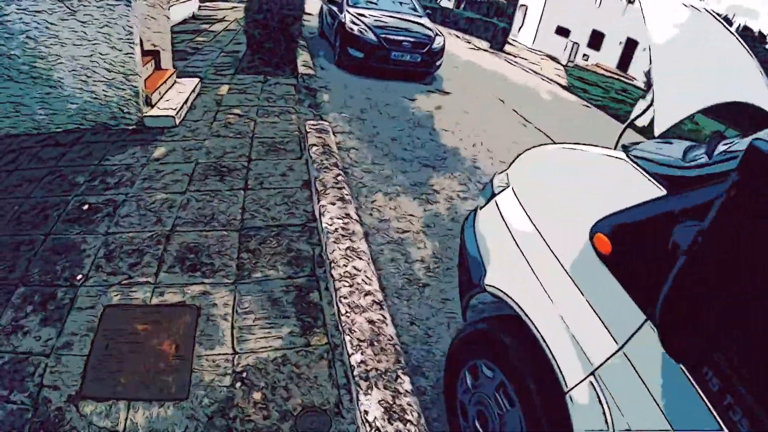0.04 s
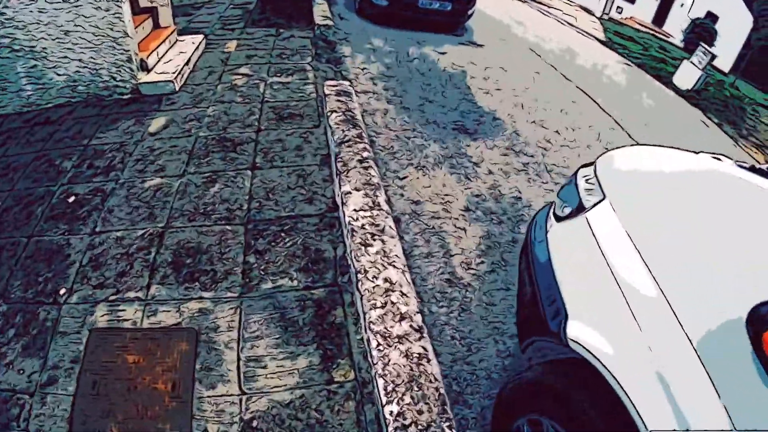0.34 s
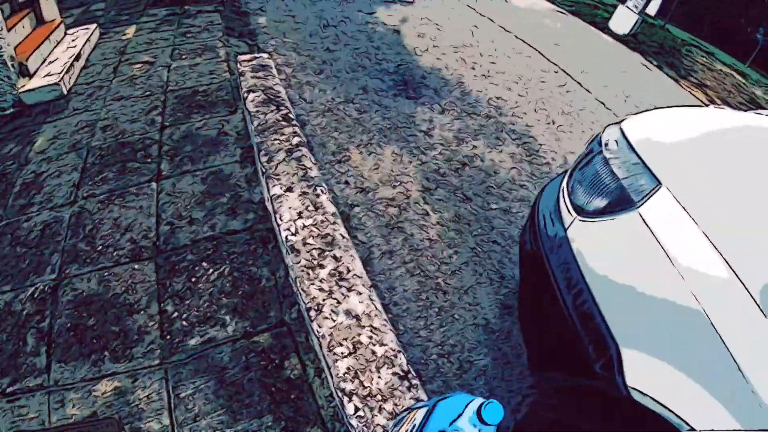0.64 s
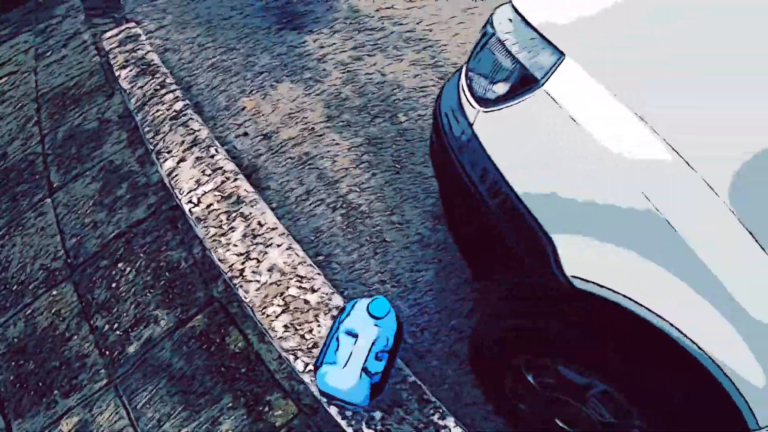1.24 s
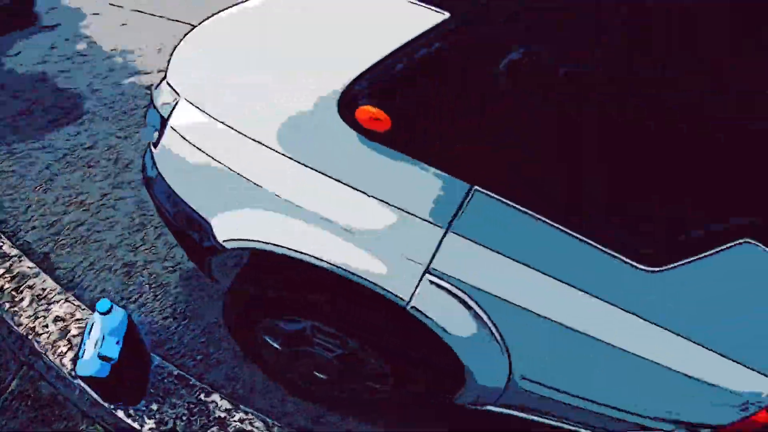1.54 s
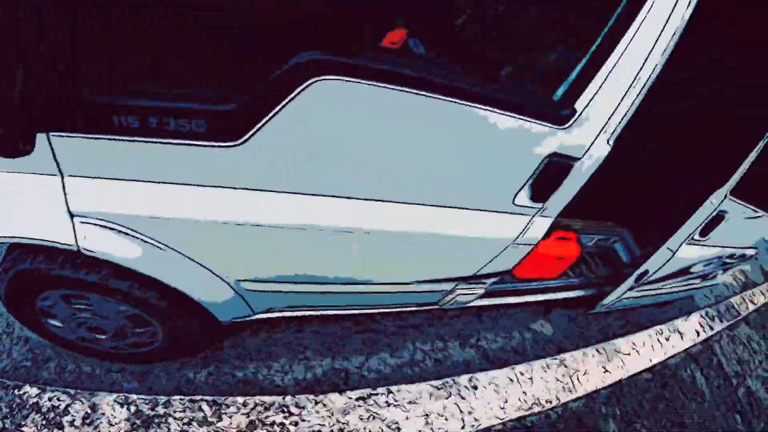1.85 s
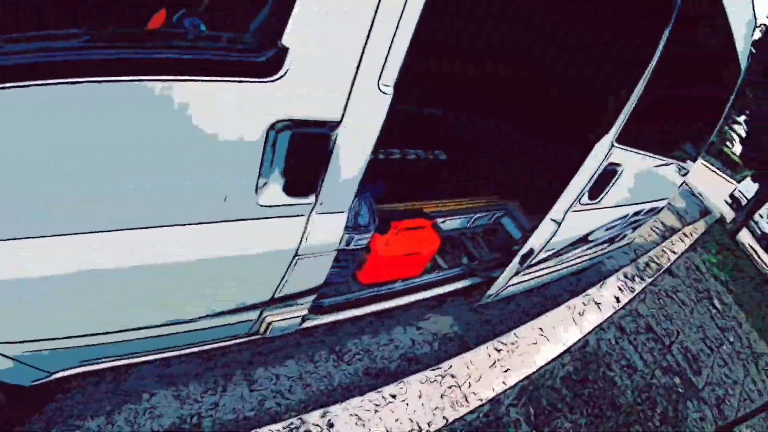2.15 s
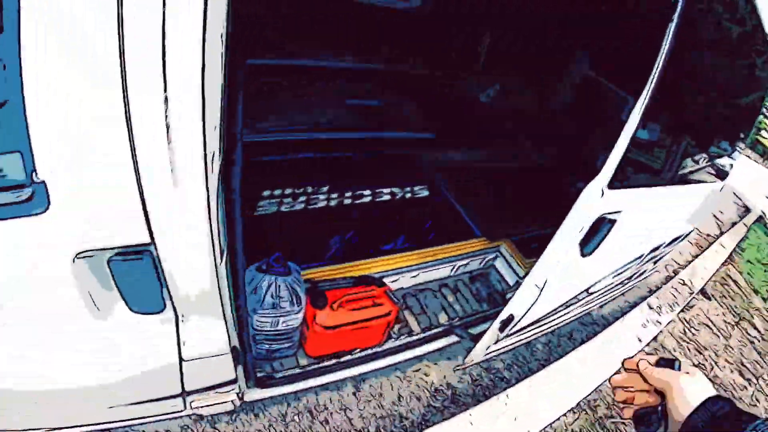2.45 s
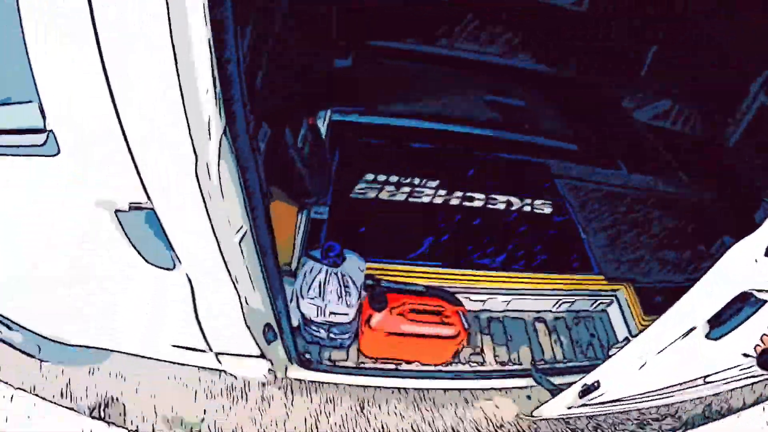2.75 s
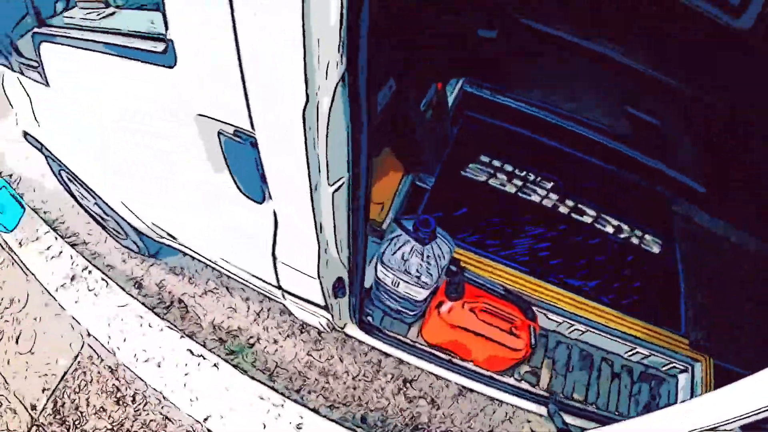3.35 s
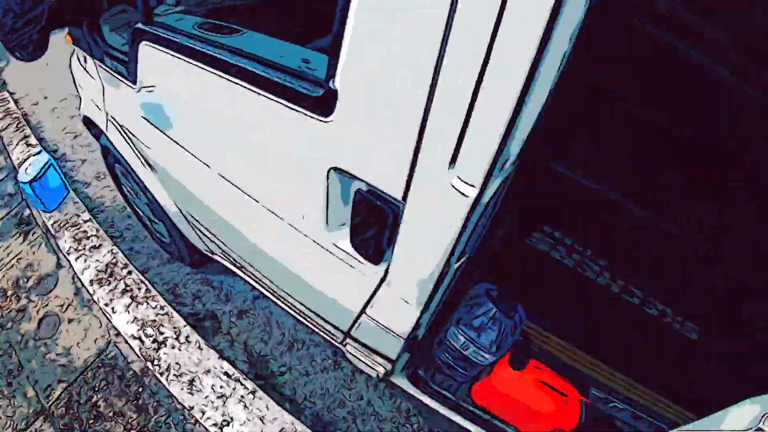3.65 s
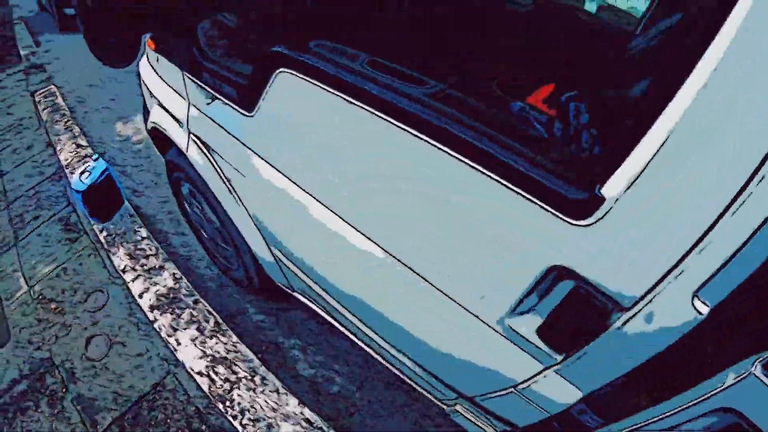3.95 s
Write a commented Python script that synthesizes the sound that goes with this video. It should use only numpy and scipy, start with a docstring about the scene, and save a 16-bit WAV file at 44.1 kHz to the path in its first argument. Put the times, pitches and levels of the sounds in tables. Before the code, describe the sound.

A van's sliding door clicks and rolls along its track, rumbling and rattling ever louder. Before that, a plastic bottle crackles as it is set down and soft steps scuff a quiet street, heard close from a body-worn microphone.

```python
"""A van's sliding door

On an almost silent street, a plastic bottle crackles as it is set down on the kerb, and soft steps
thud and scuff on the paving. A latch clicks, then the van's side door rolls along its track, rumbling
ever louder and rattling as it gathers speed. The microphone is worn on the body, close and dull."""
import sys
import numpy as np
from scipy import signal
from scipy.fft import rfft, irfft, next_fast_len
from scipy.io import wavfile
from scipy.ndimage import uniform_filter1d

SR = 44100
rng = np.random.default_rng(int(sys.argv[2]) if len(sys.argv) > 2 else 0)


def wav_out(sig):
    """Save sig, one row per channel (or a flat mono array), as 16-bit PCM at SR to the path in sys.argv[1]."""
    wavfile.write(sys.argv[1], SR, np.round(np.clip(np.atleast_2d(sig).T, -1, 1) * 32767).astype(np.int16))


N = 176400
T = np.arange(N) / SR


def from_db(db):
    """Turn decibels into a number to multiply by."""
    return 10 ** (np.asarray(db) / 20)


def rms_one(x):
    """Scale a sound to an average power of 1."""
    return x / np.sqrt(np.mean(x ** 2) + 1e-20)


def add(out, s, x):
    """Mix x in at s seconds."""
    i = int(np.clip(s * SR, 0, N - 1))
    out[i:i + len(x)] += x[:N - i]


def wander(per_s):
    """Drift at random between -2 and 2, turning per_s times a second."""
    steps = rng.standard_normal(512)
    return np.clip(np.interp(T * per_s, np.arange(len(steps)), steps), -2, 2)


def colour(x, spectrum, shift=1):
    """Give a sound its tone colour, the balance of lows and highs; shift moves that up or down."""
    size = 2 * next_fast_len(len(x))
    hz, db = np.transpose(spectrum)
    bins = np.maximum(np.arange(size // 2 + 1) * SR / size, 1)
    gains = rms_one(from_db(np.interp(np.log(bins), np.log(hz * shift), db)))
    cepstrum = irfft(np.log(gains))
    cepstrum[1:size // 2] *= 2  # folded so that nothing sounds before its hit
    cepstrum[size // 2 + 1:] = 0
    return irfft(rfft(x, size) * np.exp(rfft(cepstrum)))[:len(x)]


def ring(x, modes):
    """Make x ring at each mode, or natural note: f/Hz, level/dB, time to fade by 60 dB/s."""
    out = 0
    for hz, db, t60 in modes:
        r = np.exp(-np.log(1000) / (t60 * SR))
        feedback = [1, -2 * r * np.cos(2 * np.pi * hz / SR), r * r]
        note = signal.lfilter([1, 0, -1], feedback, x + 1e-18)
        out = out + from_db(db) * np.sqrt((1 - r * r) / 2) * note
    return out


def burst(decay_s, rise_s=0.0019):
    """Two things touch: a flurry of tiny hits that dies away."""
    t = T[:SR // 3]
    return rng.standard_normal(len(t)) * (1 - np.exp(-t / rise_s)) * np.exp(-t / decay_s)


def with_energy(x, decay_s):
    """Give x the energy of noise that starts at power 1 and has this decay."""
    return x * np.sqrt(decay_s * SR / 2 / np.sum(x ** 2))


def scrapes(rows, spectrum, reference_hz):
    """Short rubs of one tone colour, each moved from reference_hz to its own pitch."""
    out = np.zeros(N)
    for s, db, decay_s, hz in rows:
        rub = colour(burst(decay_s, rise_s=0.00073), spectrum, hz / reference_hz)
        add(out, s, from_db(db) * with_energy(rub, decay_s))
    return out


def thuds(rows):
    """Each soft blow is a low note that swells and dies quickly, with some grit."""
    out, t = np.zeros(N), T[:SR // 5]
    for s, db, hz, rise_s in rows:
        swell = (t / rise_s / 2) ** 2 * np.exp(2 - t / rise_s)
        grit = from_db(-6) * colour(rng.standard_normal(len(t)), SCUFF_COLOUR, shift=0.42)
        add(out, s - rise_s / 2, from_db(db) * swell * (np.sin(2 * np.pi * hz * t) + grit))
    return out


def clicks(rows, spectrum, modes, treble_hz=2280):
    """Hits on one object make it ring; each has its own brightness."""
    out = np.zeros(N)
    for s, db, decay_s, treble_db, ring_db in rows:
        hit = colour(burst(decay_s), [(treble_hz / 2, 0), (treble_hz, treble_db)])
        click = colour(hit, spectrum) + from_db(ring_db) * ring(hit, modes)
        add(out, s, from_db(db) * with_energy(click, decay_s))
    return out


# Loudness of the street: t/s, level/dB
STREET_LEVEL = [(0, -67.5), (.45, -68.5), (1.0, -67.5), (1.25, -72.5), (1.7, -69), (2.15, -68.5),
                (2.36, -72), (2.88, -71.5)]
# Tone colours of the street and the clothes: f/Hz, level/dB
STREET_COLOUR = [(25, -30.5), (90, 2.5), (200, -1.5), (450, -10.5), (1100, -16), (2200, -18.5), (4300, -25),
                 (6000, -35), (9000, -44.5)]
CLOTHES_COLOUR = [(25, -19.5), (110, 4), (220, 7), (500, -31.5), (1500, -53.5)]

def street():
    """A faint, dull outdoor hush; clothes brush the microphone's mount in uneven, low nudges."""
    street_db = np.interp(T, *np.transpose(STREET_LEVEL)) - 3.5 * wander(per_s=12)
    clothes_db = -79.5 + 9.5 * wander(per_s=12)
    clothes = from_db(clothes_db) * colour(rng.standard_normal(N), CLOTHES_COLOUR)
    return from_db(street_db) * colour(rng.standard_normal(N), STREET_COLOUR) + clothes


# Thuds of feet and of the swaying microphone mount: t/s, level/dB, f/Hz, rise/s
STEP_THUDS = [(0.4186, -27, 228, 0.0016), (.832, -38, 94, 0.0044), (.856, -35, 130, 0.01),
              (0.937, -36.5, 173.4, 0.0064), (0.989, -45.5, 116, 0.0051), (1.37, -43, 167.3, 0.0057),
              (1.499, -42, 100, 0.0025), (1.519, -20.5, 174.4, 0.0059), (1.545, -32, 223, 0.0061),
              (1.567, -34, 188, 0.003), (1.594, -31, 118, 0.0048), (1.625, -22.5, 202, 0.0017),
              (1.662, -32.5, 112, 0.0046), (1.69, -36, 138, 0.0058), (1.721, -41, 114, 0.0055),
              (1.76, -42.5, 177, 0.0063), (1.993, -38.5, 176, 0.0016), (2.083, -39.5, 190, 0.0031),
              (2.102, -35.5, 185, 0.0045), (2.171, -26.5, 172, 0.0058), (2.222, -44, 175, 0.0063),
              (2.432, -46.5, 161, 0.0025)]
# Soles and bottle rub on stone: t/s, level/dB, decay/s, f/Hz
SCUFFS = [(0.0, -58, 0.042, 525), (.226, -47, 0.0047, 613), (.418, -48.5, 0.027, 417),
          (0.456, -43.5, 0.036, 426), (.504, -46.5, 0.019, 490), (.533, -41, 0.0065, 480),
          (.826, -34.5, 0.04, 484), (.938, -48, 0.029, 350), (1.522, -34, 0.068, 316),
          (1.576, -41, 0.019, 475), (1.626, -36.5, 0.021, 324), (1.645, -46.5, 0.012, 404),
          (2.008, -44, 0.013, 440), (2.039, -42.5, 0.0057, 508), (2.111, -49, 0.022, 497),
          (2.162, -52.5, 0.033, 518), (2.712, -44, 0.021, 560), (2.745, -55, 0.015, 300),
          (3.127, -37, 0.068, 505)]
# Tone colour of a scuff: f/Hz, level/dB
SCUFF_COLOUR = [(45, -24), (150, 1.5), (480, 4.5), (680, 4.5), (850, -6.5), (1100, -24.5), (2300, -58.5),
                (4500, -58.5), (9000, -65.5)]

def steps():
    """Soft blows and short scuffs on the paving."""
    return thuds(STEP_THUDS) + scrapes(SCUFFS, SCUFF_COLOUR, reference_hz=500)


# Bird peeps: t/s, level/dB, f/Hz
PEEPS = [(0.059, -77, 7650), (.49, -87, 7130), (1.845, -85, 7560), (2.04, -81, 6900), (2.4, -82, 7050),
         (2.8, -91, 7500)]

def bird(peep_s=0.048, ring_s=0.05):
    """A distant bird peeps thin, wavering high notes."""
    out, t = np.zeros(N), T[:int(peep_s * SR)]
    for s, db, hz in PEEPS:
        note = rms_one(ring(rng.standard_normal(len(t)), [(hz, 0, ring_s)]))
        add(out, s, from_db(db) * np.sin(np.pi * t / peep_s) * note)
    return out


# Tiny ticks: t/s, level/dB, decay/s, f/Hz
TICKS = [(.46, -71, 0.067, 3680), (.792, -53.5, 0.021, 3120), (.905, -64, 0.0099, 7250),
         (.988, -68, 0.02, 7100), (1.148, -63.5, 0.0032, 7400), (1.329, -61, 0.0083, 4450),
         (1.449, -60, 0.0045, 5770), (1.576, -60.5, 0.0044, 4250), (1.587, -53, 0.0084, 6340),
         (1.955, -66.5, 0.23, 2230), (2.085, -69, 0.027, 6340), (2.16, -47.5, 0.0053, 2420),
         (2.713, -50.5, 0.0041, 1610), (2.715, -60, 0.0049, 3370)]
# Tone colour of a tick: f/Hz, level/dB
TICK_COLOUR = [(1000, -10.5), (3100, -15.5), (4000, 4.5), (4900, -17), (7000, -20.5), (14000, -44.5)]

def ticks():
    """Grit and crinkling plastic make small, high ticks."""
    return scrapes(TICKS, TICK_COLOUR, reference_hz=4000)


# Snaps of the plastic: t/s, level/dB, decay/s, treble/dB, ring/dB
SNAPS = [(.783, -32, 0.0016, 12, 6), (.821, -49, 0.016, -8, -23), (.829, -46, 0.0047, -2, -16),
         (.849, -52.5, 0.016, -5, -7), (.8795, -28, 0.0029, -17, -9), (.963, -47.5, 0.0054, -22, -7),
         (.995, -50.5, 0.0053, -18, 2), (1.05, -53.5, 0.0036, 1, -6), (1.07, -51.5, 0.002, -9, 6)]
# The bottle's tone colour: f/Hz, level/dB
BOTTLE_COLOUR = [(150, -13), (800, 3.5), (1150, -9.5), (1600, 5), (2200, 3), (3000, 2.5), (3600, 11.5),
                 (4200, -33), (5000, -3), (6200, -19.5), (7400, -5), (9500, -38.5)]
# Its natural notes: f/Hz, level/dB, ring time/s
BOTTLE_NOTES = [(862, -1, 0.05), (1500, -4, 0.035), (2860, -4, 0.02)]

def bottle():
    """The water bottle's plastic snaps and rings briefly as it is set down."""
    return clicks(SNAPS, BOTTLE_COLOUR, BOTTLE_NOTES)


# Clicks of the latch: t/s, level/dB, decay/s, treble/dB, ring/dB
LATCH_CLICKS = [(2.889, -50, .008, -4, 8), (2.898, -25.5, .004, -9, 13), (2.9085, -22.5, .003, 1, -5),
                (2.916, -38, .009, -2, -6), (2.9505, -37, .003, -1, -6), (2.9675, -31.5, .0028, 1, 4)]
# The latch's tone colour: f/Hz, level/dB
LATCH_COLOUR = [(100, -37), (650, 18), (1150, 6), (1700, 8), (2400, -8), (3400, 11.5), (4800, -1),
                (6300, -6), (7400, -16), (8200, -21), (9500, -43)]
# Its natural notes: f/Hz, level/dB, ring time/s
LATCH_NOTES = [(1680, 3, .045), (1900, 0, .03), (3500, -12, .05), (6300, -20, .08)]
# The door's knock: t/s, level/dB, f/Hz, rise/s
DOOR_KNOCKS = [(2.981, -30, 204, 0.01)]

def latch():
    """The latch clicks open and the door comes free with a low knock."""
    return clicks(LATCH_CLICKS, LATCH_COLOUR, LATCH_NOTES) + thuds(DOOR_KNOCKS)


# Natural notes of the door panel: f/Hz, level/dB
PANEL_NOTES = [(102, -5), (183, -1), (217, -2), (266, -1), (355, -1), (475, 2), (608, -3), (669, -4),
               (748, -4), (862, -4), (1104, -4), (1355, -2), (1631, -4), (2148, -5)]

def rollers(level_db, spectrum, trim_db, steady_s, bumps_per_s=7000):
    """Rollers cross many tiny bumps and shake the panel; the steady push evens out the loudness."""
    bumps = (rng.random(N) < bumps_per_s / SR) * rng.choice([-1, 1], N)
    modes = [(hz, db, 0.28 * (hz / 1000) ** -0.15) for hz, db in PANEL_NOTES]  # high notes die sooner
    panel = rms_one(colour(ring(bumps, modes), spectrum))
    sound = rms_one(colour(bumps, spectrum)) + from_db(-12) * panel
    loudness = np.sqrt(uniform_filter1d(sound ** 2, int(steady_s * SR)) + 1e-9)
    return from_db(level_db + trim_db) * sound / loudness


# Pitch of the rollers' drone: t/s, f/Hz
DRONE_PITCH = [(3.0, 255), (3.38, 295), (3.55, 385), (3.69, 480), (3.82, 385), (4.0, 352)]

def drone(level_db):
    """The rollers ring with a wavering hum whose pitch shifts as they travel."""
    phase = 2 * np.pi * np.cumsum(np.interp(T, *np.transpose(DRONE_PITCH))) / SR
    hum = wander(per_s=80) * np.cos(phase) + wander(per_s=80) * np.sin(phase)
    return from_db(level_db) * rms_one(hum)


# Natural notes of the door's metal fittings: f/Hz, level/dB
FITTING_NOTES = [(1350, -4), (1690, 3.5), (2110, -2.5), (2420, -6.5), (2830, -12), (3450, -7), (3740, -10),
                 (4390, -11.5)]

def chatter(level_db, knocks_per_s=85, spread_db=5.5, ring_s=0.07, top_hz=5000):
    """Loose fittings knock at random; each knock rings every note with a strength of its own."""
    knocks = rng.random(N) < knocks_per_s / SR
    sound = 0
    for hz, db in FITTING_NOTES:
        strength = from_db(spread_db * np.clip(rng.standard_normal(N), -2, 2)) * rng.choice([-1, 1], N)
        sound = sound + ring(knocks * strength, [(hz, db, ring_s)])
    sound = signal.sosfilt(signal.butter(2, top_hz, fs=SR, output="sos"), sound)
    return from_db(level_db) * rms_one(sound)


# The roll's four parts before trim_db: t/s, panel boom/dB, roller growl/dB, track noise/dB, treble/dB
ROLL_LEVELS = [(2.93, -54, -46, -63, -54.5), (2.977, -51, -32.5, -53.5, -51), (3.036, -33, -37.5, -75, -78),
               (3.116, -38.5, -47, -70, -84), (3.265, -28, -26.5, -53.5, -73),
               (3.286, -32, -25.5, -40, -49), (3.394, -23, -22, -35.5, -53.5),
               (3.467, -31, -20.5, -33, -44), (3.698, -26, -19.5, -27, -41.5),
               (3.808, -23, -19.5, -30.5, -41), (3.888, -30, -21, -25, -44.5),
               (3.94, -20.5, -19, -25, -40.5), (4.0, -23, -16, -35, -46.5)]
# Their tone colours: f/Hz, level/dB
BOOM_COLOUR = [(20, -50.5), (60, -18.5), (100, -7), (125, -3), (165, 11), (270, 8.5), (340, -2),
               (900, -80.5)]
GROWL_COLOUR = [(60, -64.5), (230, -5.5), (310, 4.5), (380, 5), (490, 1.5), (570, -1), (760, -7.5),
                (900, -29), (1100, -47), (3000, -80.5)]
TRACK_COLOUR = [(200, -50), (850, 3), (1100, -2), (1400, -3), (2100, -6.5), (2450, -15), (2900, -24.5),
                (5500, -71)]
TREBLE_COLOUR = [(1300, -52.5), (2900, 5), (3600, 6), (4400, -1.5), (5500, -7.5), (7800, -19.5),
                 (9500, -46)]

def rolling_door(fade_in_s=0.042):
    """The door rumbles and judders along its track, louder as it gathers speed."""
    times, *levels = np.transpose(ROLL_LEVELS)
    boom_db, growl_db, track_db, treble_db = [np.interp(T, times, level) for level in levels]
    judder_db = 1.5 * wander(per_s=70)
    fade_in = np.clip((T - times[0]) / fade_in_s + 1, 0, 1)
    boom = rollers(boom_db, BOOM_COLOUR, trim_db=1, steady_s=0.025)
    growl = rollers(growl_db, GROWL_COLOUR, trim_db=-1, steady_s=0.089)
    track = rollers(track_db + judder_db, TRACK_COLOUR, trim_db=1, steady_s=0.075)
    treble = rollers(treble_db + judder_db, TREBLE_COLOUR, trim_db=-2.5, steady_s=0.038)
    return fade_in * (boom + growl + track + treble + drone(growl_db - 8) + chatter(treble_db + 3.5))


# Rattles of the door: t/s, level/dB, decay/s, f/Hz, ring/dB
RATTLES = [(3.208, -69.5, 0.2, 2190, 10.5), (3.281, -42, 0.0088, 3450, -0.5),
           (3.357, -39.5, 0.0092, 2370, -6), (3.446, -40.5, 0.004, 3400, 6.5), (3.524, -37, .014, 3444, 6),
           (3.713, -33.5, 0.02, 2100, 4), (3.769, -53.5, 0.0057, 4430, 17), (3.786, -25, 0.066, 4410, -20),
           (3.872, -34, 0.015, 1100, 3), (3.917, -32.5, 0.0081, 3140, 8), (3.922, -24, 0.0065, 2404, 7.5),
           (3.944, -28.5, 0.016, 1470, 4.5)]
# Tone colour of a rattle: f/Hz, level/dB
RATTLE_COLOUR = [(100, -52.5), (800, 21.5), (1800, 8), (3300, 3.5), (5500, -13), (7700, -7.5),
                 (9200, -30.5)]

def rattles(ring_s=0.027):
    """The door knocks in its guides; each hit rings at its own pitch."""
    out = np.zeros(N)
    for s, db, decay_s, hz, ring_db in RATTLES:
        hit = burst(decay_s)
        clack = with_energy(colour(hit, RATTLE_COLOUR), decay_s)
        note = with_energy(ring(hit, [(hz, 0, ring_s)]), decay_s)
        add(out, s, from_db(db) * (clack + from_db(ring_db) * note))
    return out


def scene():
    """Bottle, steps and door over the quiet street, in one channel."""
    kerb = bottle() + steps() + ticks()
    door = rolling_door() + latch() + rattles()
    return (kerb + door + street() + bird())[None]


def record(dry, low_cut_hz=46, high_cut_hz=8700):
    """The microphone thins the deepest bass; the highest treble is cut steeply."""
    thinned = signal.sosfilt(signal.butter(2, low_cut_hz, "high", fs=SR, output="sos"), dry)
    return signal.sosfilt(signal.ellip(10, .1, 70, high_cut_hz, fs=SR, output="sos"), thinned)


dry = scene()
out = record(dry)
wav_out(out)
```